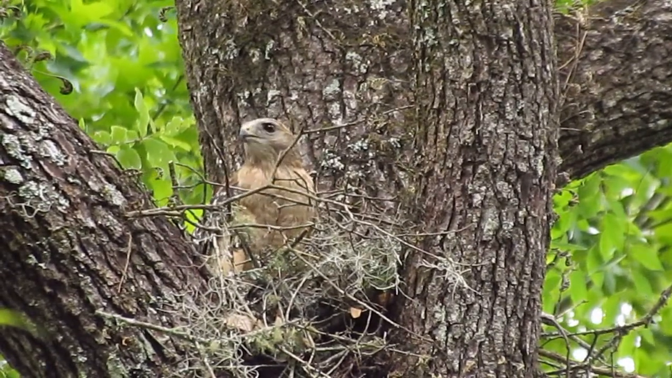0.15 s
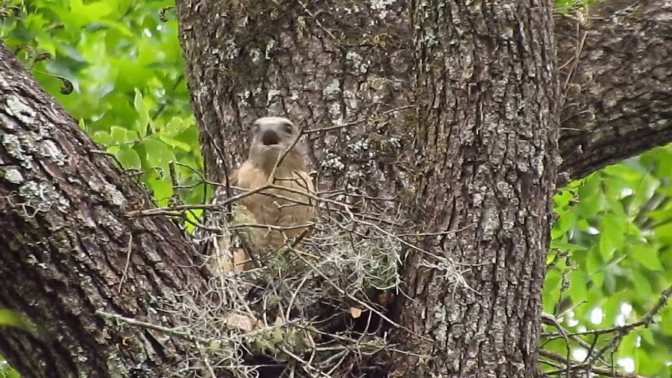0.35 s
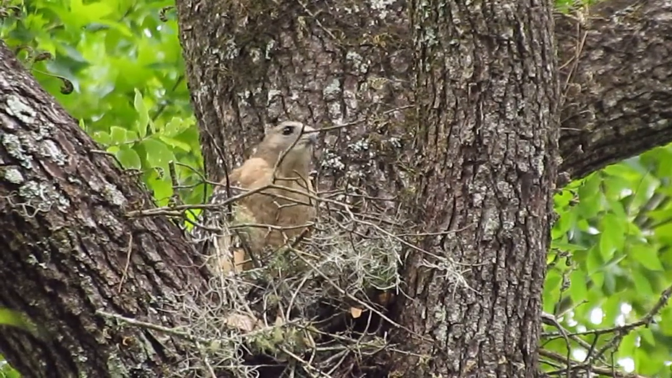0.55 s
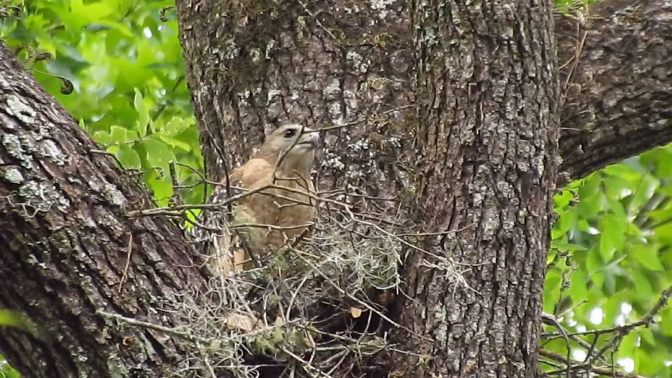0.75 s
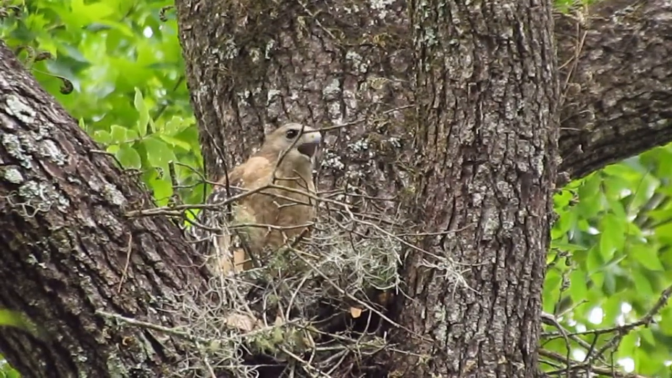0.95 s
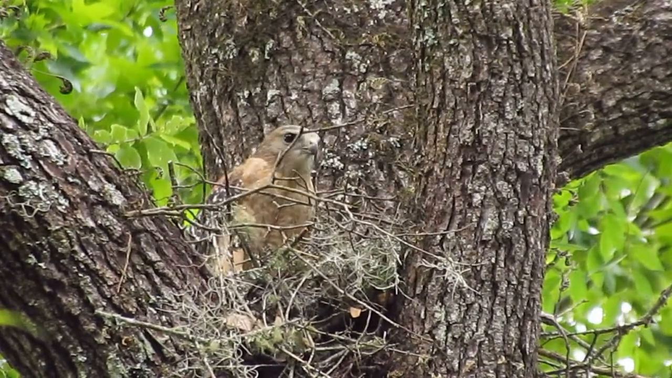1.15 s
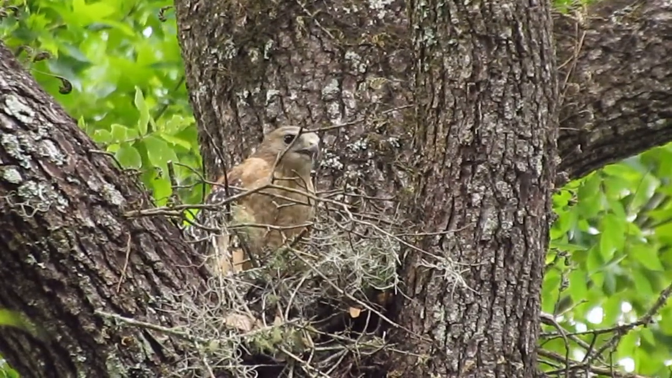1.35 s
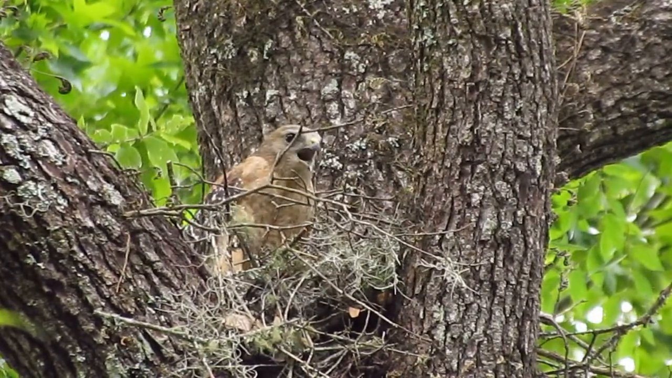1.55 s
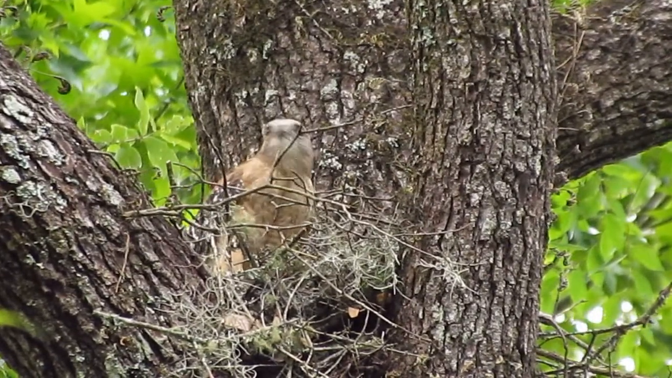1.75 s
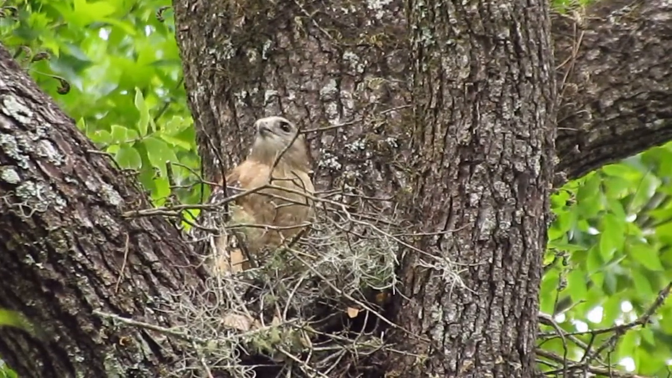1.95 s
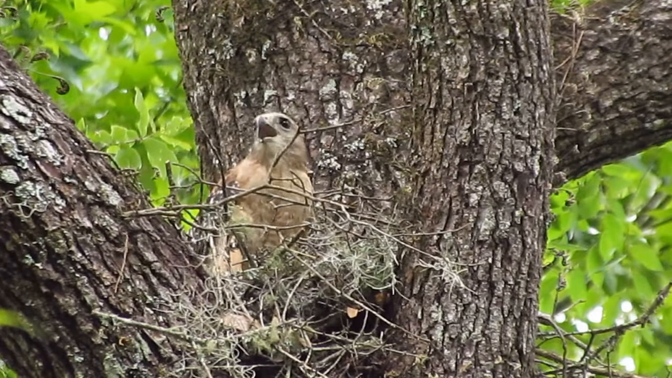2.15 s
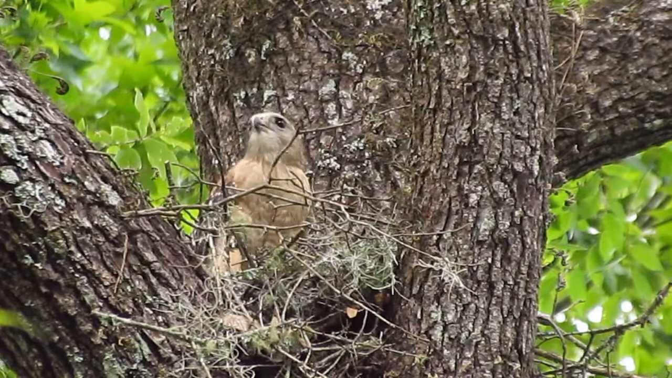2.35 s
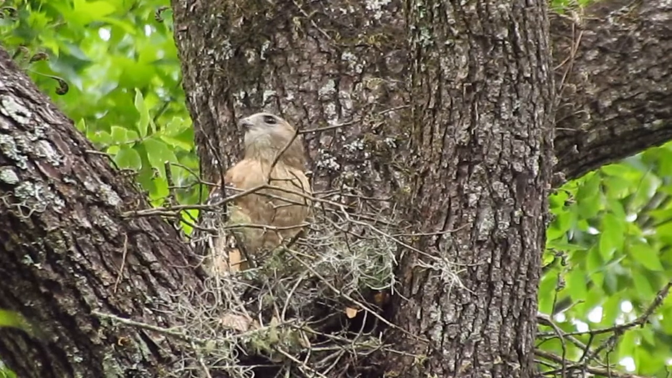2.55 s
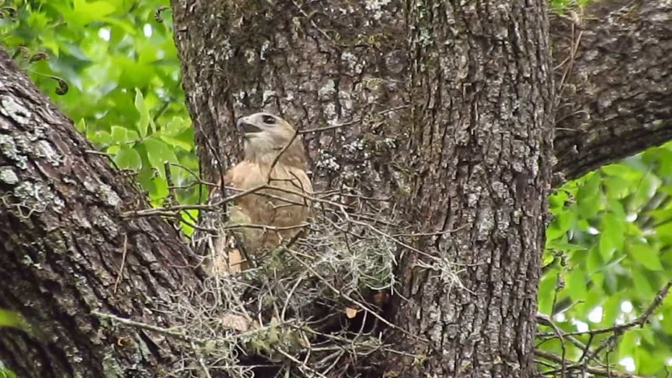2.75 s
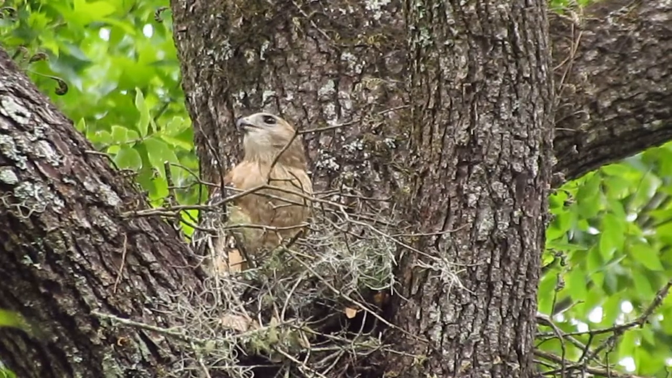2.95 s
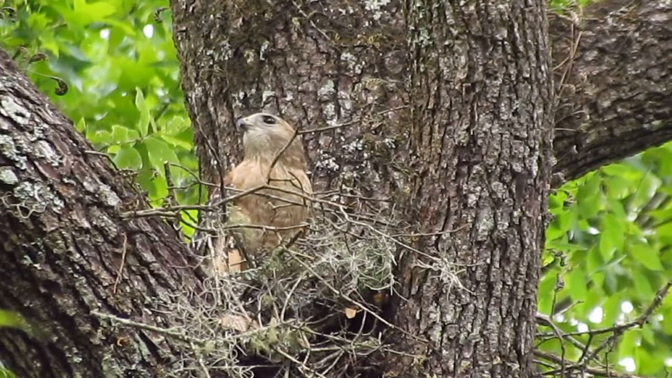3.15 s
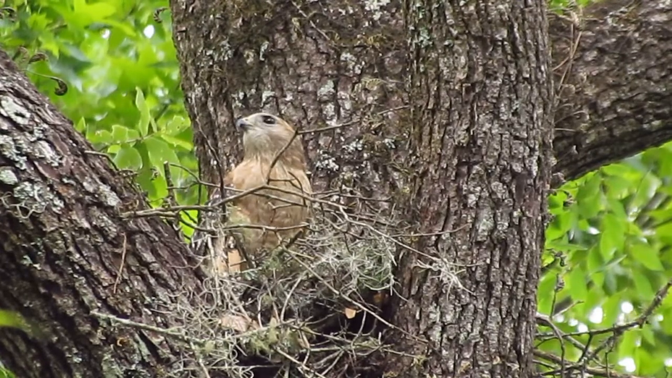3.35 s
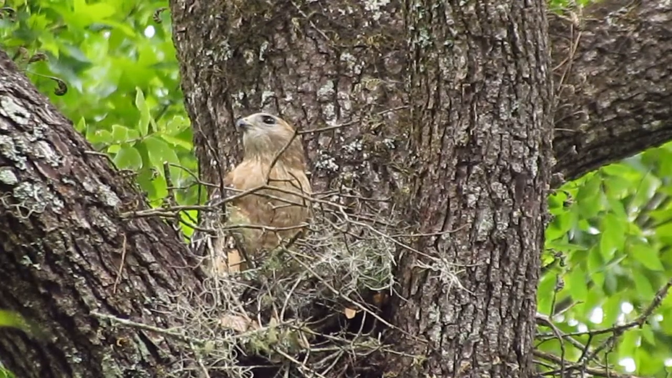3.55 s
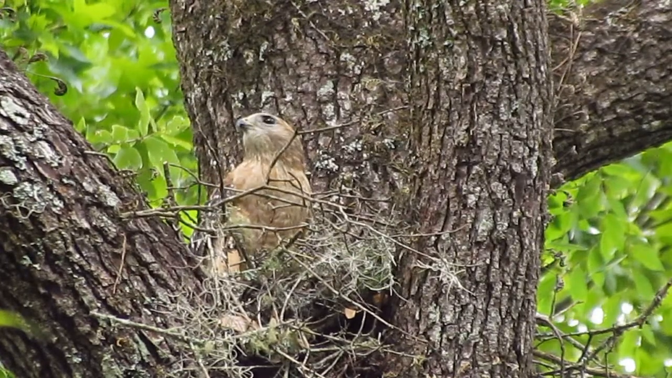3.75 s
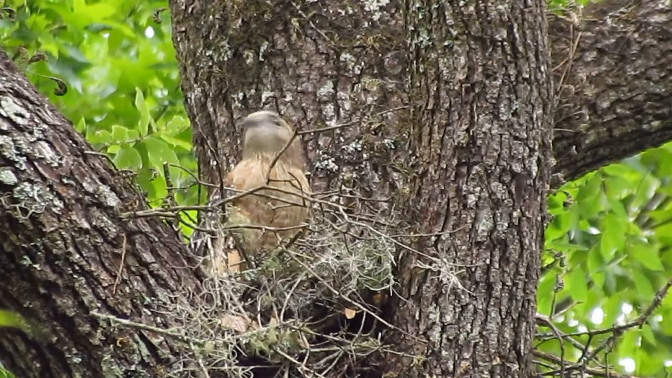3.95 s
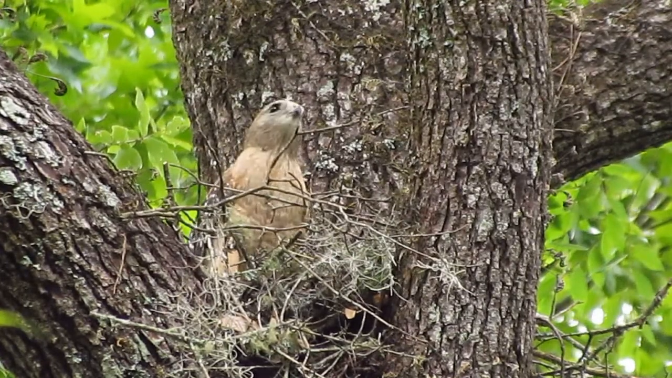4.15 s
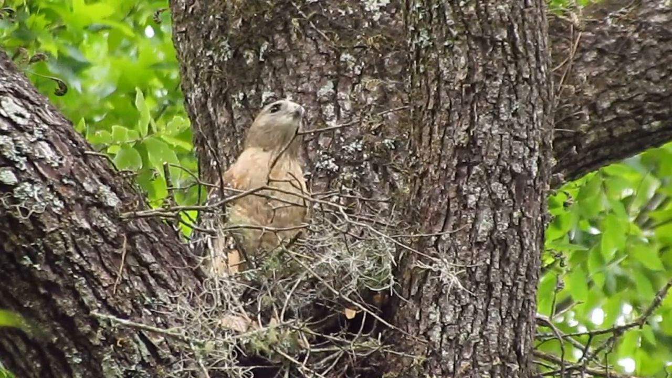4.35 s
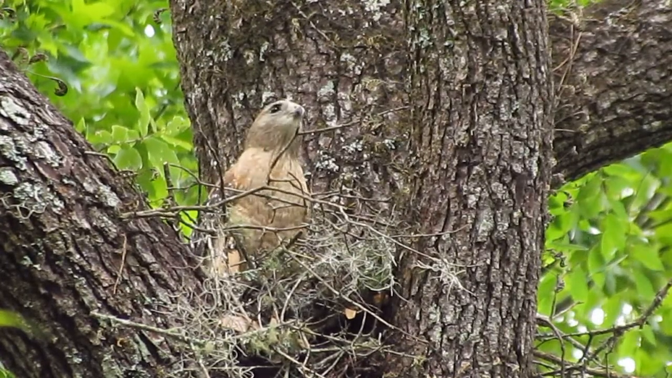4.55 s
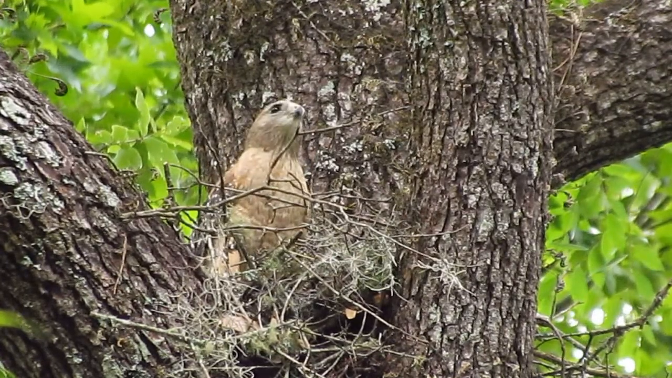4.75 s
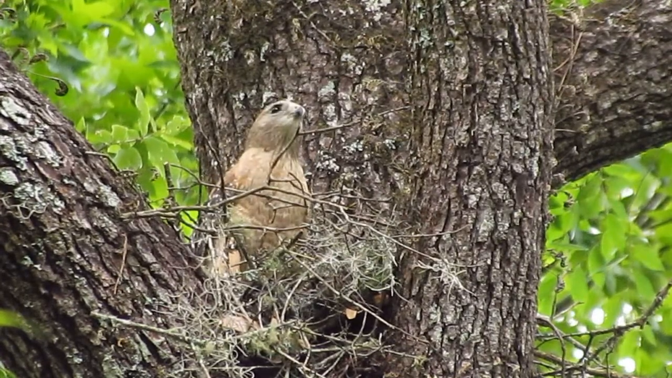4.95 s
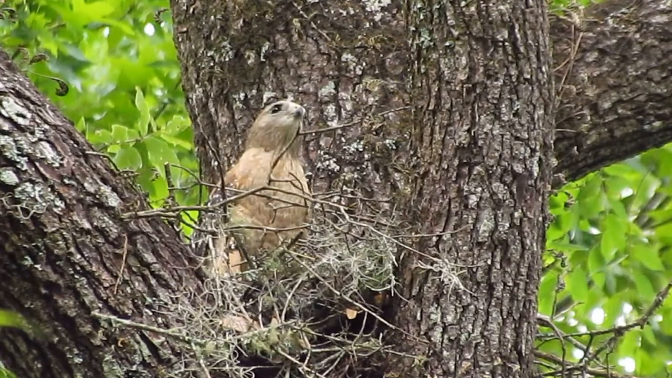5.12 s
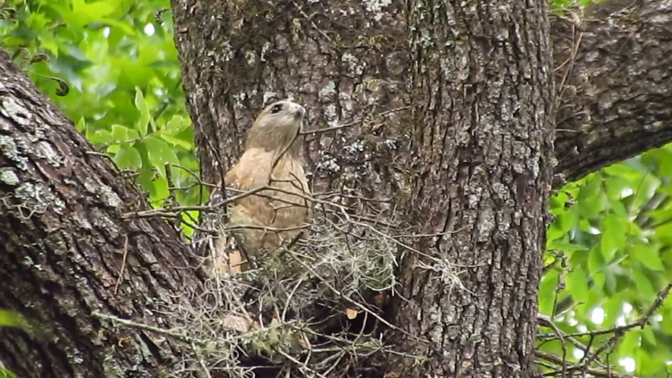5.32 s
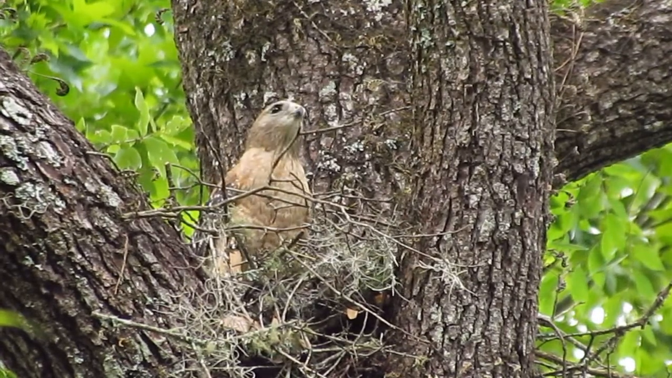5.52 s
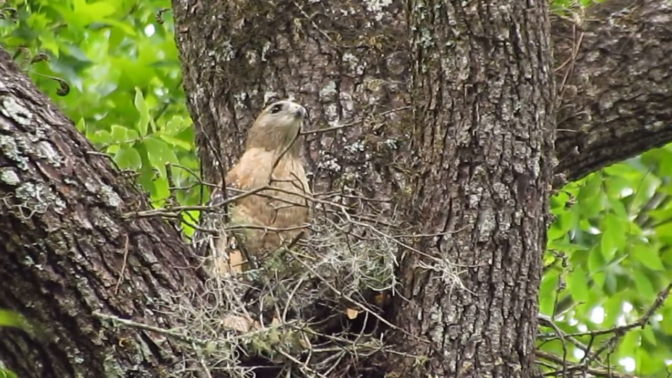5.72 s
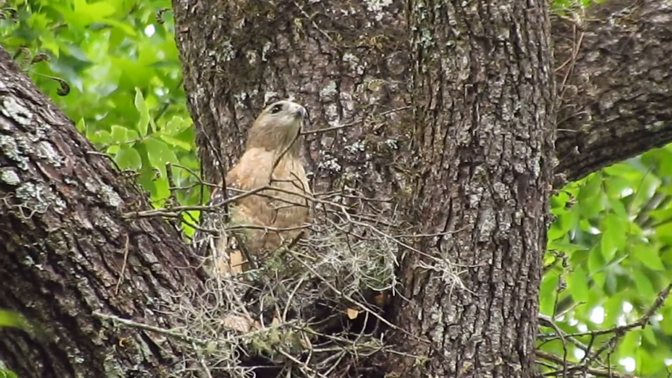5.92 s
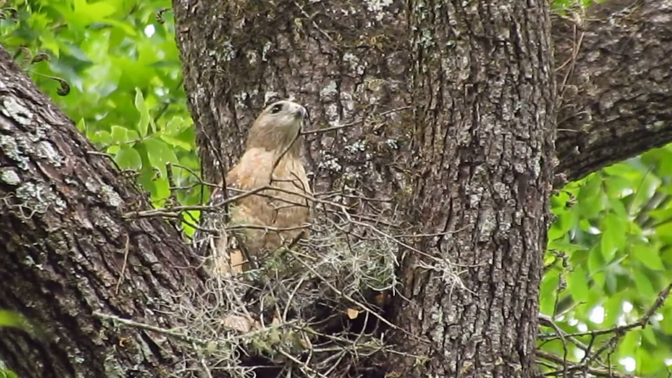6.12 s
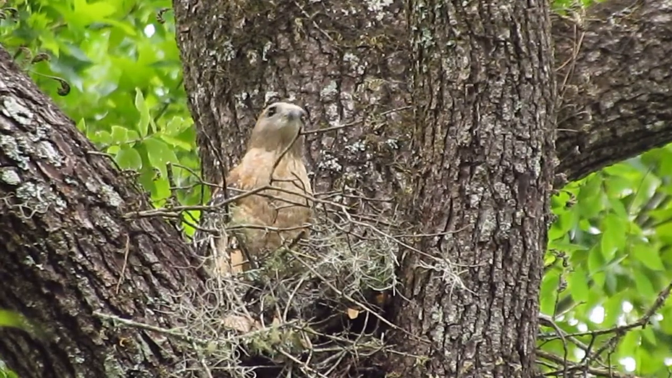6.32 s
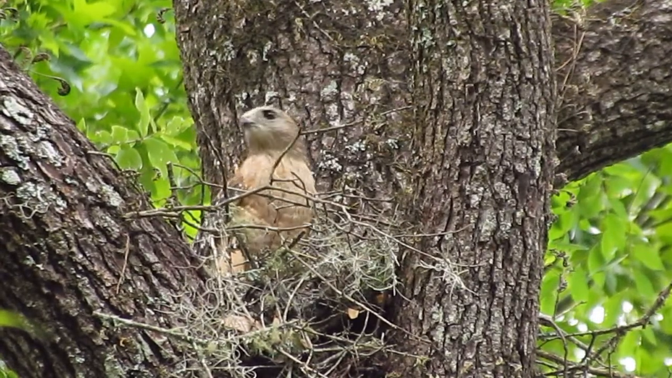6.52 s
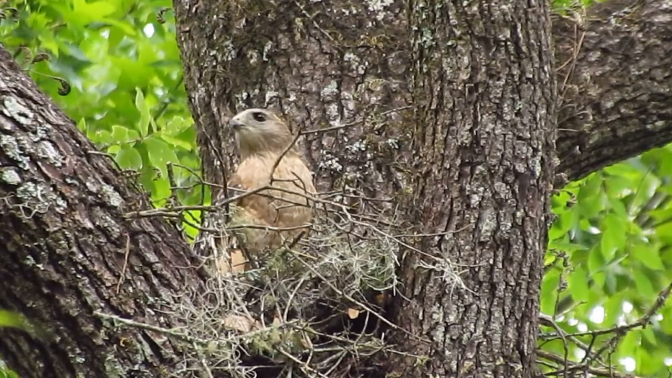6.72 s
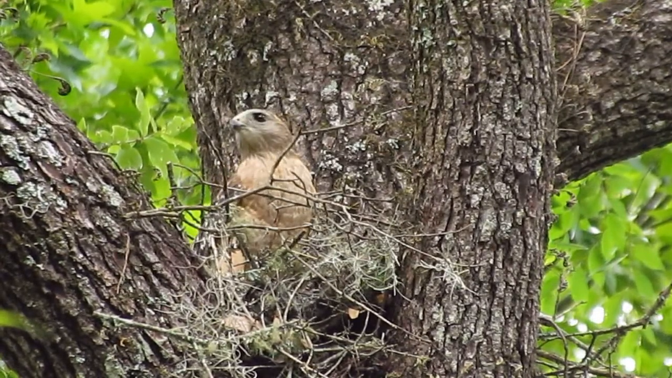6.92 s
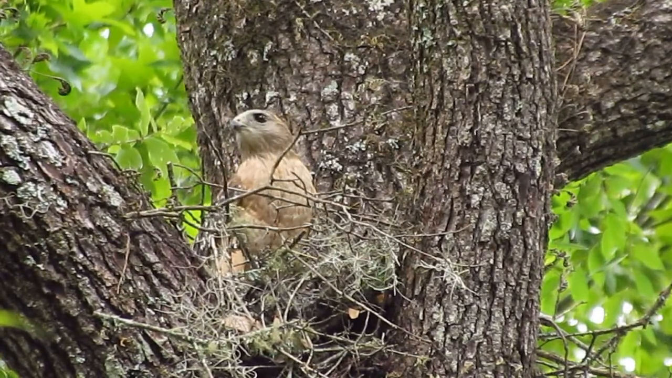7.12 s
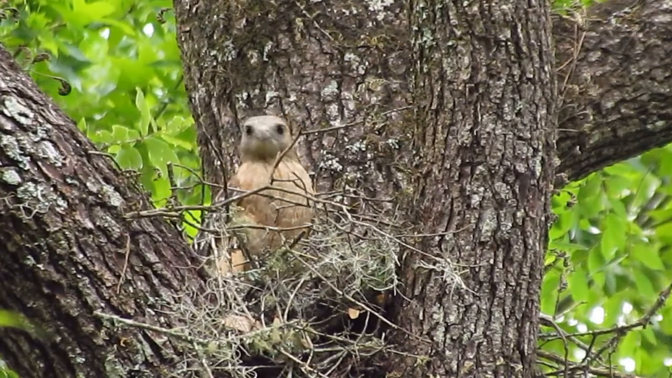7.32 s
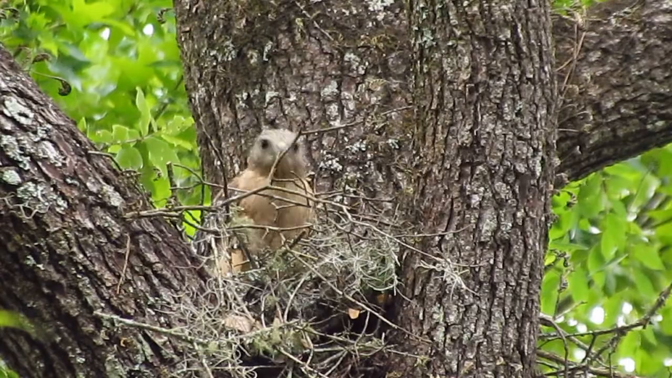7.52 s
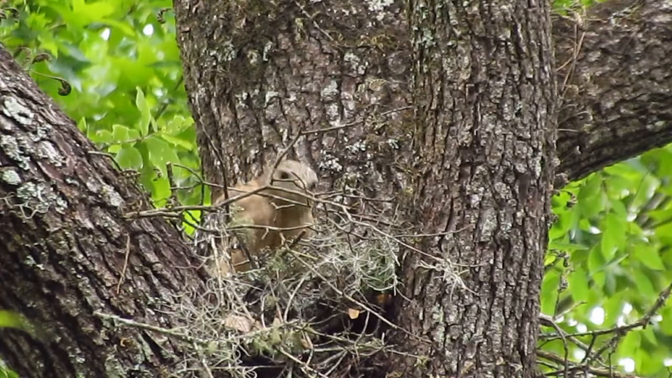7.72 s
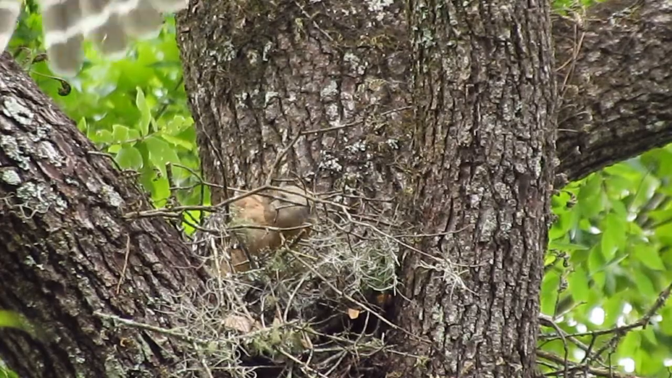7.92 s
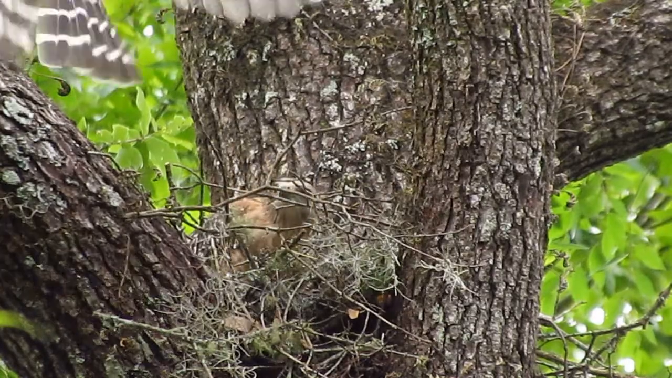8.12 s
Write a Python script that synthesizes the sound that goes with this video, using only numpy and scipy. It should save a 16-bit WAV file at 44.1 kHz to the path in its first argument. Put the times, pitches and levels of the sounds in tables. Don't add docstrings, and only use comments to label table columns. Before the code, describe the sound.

Outdoors among big trees, a hawk on its nest gives five loud, shrill falling screams about 0.6 seconds apart, each echoing off trunks and leaves. Then the calls stop; twigs crack sharply, a farther bird whistles a warbling reply, a brief rough croak sounds, and small birds chip. High crickets and a trilling insect continue over a faint distant traffic rumble.

```python
import sys
import numpy as np
from scipy import signal
from scipy.fft import rfft, irfft, next_fast_len
from scipy.io import wavfile
from scipy.ndimage import uniform_filter1d, map_coordinates

SR = 44100
rng = np.random.default_rng(int(sys.argv[2]) if len(sys.argv) > 2 else 0)


def unload_wav(signal):
    wavfile.write(
        sys.argv[1],
        SR,
        np.round(np.clip(np.atleast_2d(signal).T, -1, 1) * 32767).astype(np.int16),
    )


def convert_level_to_amplitude(level_db):
    exponent = np.asarray(level_db, float) / 20
    return 10 ** exponent


N = 365148
LEAD_S = 1
M = N + LEAD_S * SR
TIME = np.arange(M) / SR - LEAD_S


def unit(x):
    return x / np.sqrt(np.mean(x ** 2) + 1e-20)


def along(points, hz):
    f, v = np.transpose(points)
    return np.interp(np.log(hz + 1), np.log(f + 1), v)


def wobble(knots_per_s):
    knots = rng.standard_normal(int(M * 400 / SR) + 4)
    return map_coordinates(knots, [np.arange(M) * min(knots_per_s, 400) / SR], order=1)


def turns(hz):
    return 2 * np.pi * np.cumsum(hz) / SR


def span(start_s, length_s):
    first = round((start_s + LEAD_S) * SR)
    part = slice(first, min(M, round((start_s + length_s + LEAD_S) * SR)))
    return part, TIME[part]


# hz, correlation
ALIKE = [(30, 0.99), (100, 0.64), (250, 0.24), (700, 0.066), (2000, 0.11), (8000, 0.022)]


def rush(spectrum, patchy_db):
    z = signal.stft(rng.standard_normal((2, M)), nperseg=512)[2]
    field = uniform_filter1d(rng.standard_normal(z.shape[1:]), 6, 0)
    field = uniform_filter1d(field, 14, 1)
    pair = signal.istft(z * convert_level_to_amplitude(patchy_db * unit(field)), nperseg=512)[1][:, :M]
    size = next_fast_len(M)
    hz = np.fft.rfftfreq(size, 1 / SR)
    turn = np.arccos(np.clip(along(ALIKE, hz), -1, 1)) / 2
    shaped = rfft(pair, size) * convert_level_to_amplitude(along(spectrum, hz))
    mid, side = irfft(shaped * [np.cos(turn), np.sin(turn)], size)[:, :M]
    return unit(np.array([mid + side, mid - side]))


# hz, t60_s
WOOD = [(500, 0.28), (1300, 0.89), (2600, 1.22), (5000, 1.03), (9000, 0.77), (14000, 0.98)]


def wood(x, gap_s, alike):
    hz, t, z = signal.stft(rng.standard_normal((2, SR + SR // 5)), SR, nperseg=256)
    a, b = signal.istft(z * convert_level_to_amplitude(-60 * t / along(WOOD, hz)[:, None]), SR, nperseg=256)[1]
    turn = np.arccos(np.clip(alike, -1, 1)) / 2
    mid, side = np.cos(turn) * a, np.sin(turn) * b
    tail = np.array([mid + side, mid - side])
    tail *= np.clip(np.arange(len(a)) / SR / gap_s, 0, 1) ** 2 / np.linalg.norm(a)
    return signal.fftconvolve(x[None], tail, axes=1)[:, :M]


def leaves(x, t60_s):
    t = np.arange(SR // 10) / SR
    scatter = np.diff(rng.standard_normal((2, len(t) + 1))) * convert_level_to_amplitude(-60 * t / t60_s)
    return signal.fftconvolve(x[None], scatter / np.linalg.norm(scatter[0]), axes=1)[:, :M]


# hz, density_db
TRAFFIC = [(8.8, -52), (15, -9.5), (49, 0), (143, -9.5), (190, -13), (358, -19.5), (520, -22), (880, -120)]
AIR = [(120, -16.5), (200, -3.5), (346, -11), (983, -10), (1390, -14), (4200, -17), (5460, -11),
       (9240, -120)]
LEAF_HISS = [(4200, -8), (5600, 14), (6600, 4), (8600, -5), (10000, 3), (13500, -5), (15000, -27)]


def background():
    rumble = convert_level_to_amplitude(-49.5 + 1.8 * wobble(2.72)) * rush(TRAFFIC, patchy_db=0.5)
    air = convert_level_to_amplitude(-52) * rush(AIR, patchy_db=2.5)
    hiss = convert_level_to_amplitude(-51.5) * rush([(2200, -74)] + LEAF_HISS, patchy_db=2.6)
    return rumble + air + hiss


# pitch_hz, pulses_per_s, level_db
CRICKETS = [(4660, 56, -8.5), (4715, 47.9, -9), (4814, 43, -3.5), (4904, 47.8, -1), (5100, 53, -5),
            (5250, 43, -12)]
# time_s, level_db
CHORUS = [(3.2, -52.5), (3.53, -52), (4.02, -51.5), (4.84, -52), (5.26, -50), (5.66, -52), (6.06, -52.5),
          (6.3, -51.5), (7.68, -51.5), (8.02, -53.5), (8.28, -49.5)]


def crickets():
    chorus = 0
    drift = 0.003 * wobble(2.02)
    for pitch_hz, pulses_per_s, level_db in CRICKETS:
        stroke = np.clip(np.sin(turns(pulses_per_s * (1 + drift))) + 0.068, 0, None)
        tone = np.sin(turns(pitch_hz * (1 + 0.008 * wobble(40))))
        chorus = chorus + convert_level_to_amplitude(level_db + 1.4 * wobble(2.994)) * stroke * tone
    chorus = unit(chorus) * convert_level_to_amplitude(np.interp(TIME, *np.transpose(CHORUS)) + 4)
    straight = 0.65 * chorus * convert_level_to_amplitude([[1.5], [-1.5]])
    return straight + 1.04 * wood(chorus, gap_s=0.038, alike=0.024) * convert_level_to_amplitude([[1.2], [-1.2]])


# first_pip_s, length_s, level_db
TRILLS = [(-.204, 0.88, -47), (1.2, 0.9, -45.5), (2.405, 0.68, -47), (3.624, 1, -46.5), (4.863, 1, -47.5),
          (6.2805, 0.97, -46.5), (7.446, 1, -47.5)]


def triller():
    out, uneven = np.zeros(M), convert_level_to_amplitude(wobble(25))
    for first_pip_s, length_s, level_db in TRILLS:
        part, t = span(first_pip_s - 0.016, length_s)
        u = ((t - first_pip_s) * 30.3 + 0.5) % 1 - 0.5
        warm = 1 - np.exp(-(t - first_pip_s + 0.03) / 0.083)
        pitch_hz = (5250 + 530 * warm) * (1 - 0.3285 * u)
        fade = warm * np.clip((first_pip_s + length_s - t) / 0.56, 0, 1)
        out[part] = convert_level_to_amplitude(level_db + 3) * fade * np.exp(-(u / 0.13) ** 2) * np.sin(turns(pitch_hz))
    out *= uneven
    return out * convert_level_to_amplitude([[1.2], [-1.2]]) + 0.47 * wood(out, gap_s=0.016, alike=0.18)


CLIMB_HZ_PER_S2 = 38000
SLIDE_S, AAH_PITCH = 0.08, 0.9
DROOP_HZ, DROOP_S = 45.5, 0.01816
RING_HZ, RING_WIDTH_HZ = 2490, 22.3


def contour(start_s, length_s, climb_s, top_hz, last_hz, full_db, full_s, spent_db, swell_db, dulling_db):
    t = np.linspace(0, length_s, num=70)
    late, left = t - climb_s, length_s - t
    aah_top_hz = AAH_PITCH * top_hz
    slid = (late - SLIDE_S) / (length_s - climb_s - SLIDE_S)
    aah_hz = aah_top_hz + (last_hz + DROOP_HZ - aah_top_hz) * slid
    kee = np.exp(-(1.8 * np.clip(late, 0, None) / SLIDE_S) ** 2)
    pitch_hz = aah_hz + (top_hz - aah_hz) * kee
    pitch_hz -= CLIMB_HZ_PER_S2 * np.clip(late, None, 0) ** 2 + DROOP_HZ * np.exp(-left / DROOP_S)

    db = spent_db + (full_db - spent_db) / (1 + np.exp((t - full_s) / 0.016))
    db += -3.5 * np.exp(-t / 0.0091) - 5.5 * t
    push_db = swell_db * np.exp(-((2 * pitch_hz - RING_HZ) / RING_WIDTH_HZ) ** 2)
    bright = 2 + dulling_db * t + 5.5 * np.exp(-t / 0.032)
    bright -= 0.12 * (db + 24.5) + 1.6 * push_db
    trim_db = -8.5 - 0.15 * (db + 22) - push_db
    return np.transpose([start_s + t, pitch_hz, db + push_db, bright, trim_db])


# hz, level_db
THROAT = [(500, -2.5), (1300, -3.5), (2850, 2), (3300, -15), (4300, -13), (7000, -19), (10500, -32),
          (14000, -39.5)]


def scream(rows, jitter, scoop_s=0.022, drop_s=0.042):
    first, last = rows[0], rows[-1]

    def bent(row, after_s, ratio, db, trim_db):
        return (row[0] + after_s, ratio * row[1], row[2] + db, row[3] + trim_db, row[4])

    rows = [bent(first, -scoop_s, 0.45, -22, -9),
            bent(first, -0.2017 * scoop_s, 0.71, -9, -4),
            *rows,
            bent(last, 0.264 * drop_s, 0.78, -11, -12),
            bent(last, drop_s, 0.68, -24, -12)]
    s, *cols = np.transpose(rows)
    part, t = span(s[0], s[-1] - s[0])
    pitch_hz, db, bright, trim_db = (uniform_filter1d(np.interp(t, s, c), size=300) for c in cols)
    loose = uniform_filter1d(((t < first[0]) | (t > last[0])) * 1.0, size=300)
    phase = turns(pitch_hz * (1 + (1 + 6 * loose) * jitter[part]))
    k = np.arange(1, 20)[:, None]
    flicker = uniform_filter1d(rng.standard_normal((len(k), SR // 2)), size=700, axis=1)
    flicker = unit(flicker)[:, :len(t)]
    line_db = along(THROAT, k * pitch_hz) + bright * np.log2(np.maximum(k, 2) / 2)
    line_db += trim_db * (k == 1) + 2.26 * np.log2(k) * flicker
    lines = convert_level_to_amplitude(line_db) * (k * pitch_hz < 15000) * np.sin(k * phase + 0.291 * k * k)
    rasp = unit(uniform_filter1d(rng.standard_normal(SR // 2), size=12))[:len(t)]
    voice = np.sum(lines, axis=0) + convert_level_to_amplitude(-12) * rasp * np.sum(lines[2:], axis=0)
    edges = np.clip(np.minimum(t - s[0], s[-1] - t) / 0.00067, 0, 1)
    return part, np.sqrt(2) * convert_level_to_amplitude(db - 0.5) * edges * voice


# start_s, length_s, climb_s, top_hz, last_hz
SCREAMS = [(0.314, 0.21, 0.035, 1342, 1140), (0.907, 0.21, 0.031, 1419, 1215),
           (1.48, 0.25, 0.041, 1448, 1177), (2.101, .263, .064, 1388, 1149),
           (2.772, 0.27, 0.055, 1330, 1011)]
# full_db, full_s, spent_db, swell_db, dulling_db_per_octave_s
EFFORT = [(-23, 0.12, -27, 2.5, -8.5), (-18.5, 0.067, -24.5, 6, -9), (-16, 0.083, -23, 5.5, -18.5),
          (-21.5, 0.18, -24.5, 2, -13), (-21.5, .137, -26, 9, -31)]


def hawk():
    out, jitter = np.zeros(M), 0.0013 * wobble(120)
    shapes = [(-0.23, 0.206, 0.032, 1320.5, 1123.5), *SCREAMS]
    efforts = [(-24, -0.37, -32, -1, -8), *EFFORT]
    for shape, effort in zip(shapes, efforts):
        part, call = scream(contour(*shape, *effort), jitter)
        out[part] += call
    return out * convert_level_to_amplitude(0.067 * wobble(60))


# start_s, pitch_hz, level_db, t60_s
THUMP = (2.5, 102, -52, .14)


def thump():
    out, (start_s, pitch_hz, level_db, t60_s) = np.zeros(M), THUMP
    part, t = span(start_s, 0.2)
    t = t - start_s
    out[part] = convert_level_to_amplitude(level_db - 60 * t / t60_s) * np.sin(2 * np.pi * pitch_hz * t)
    return out


# start_s, peak_db, body_hz, echo_db
SNAPS = [(3.537, -30, 1270, 2), (3.55, -24, 4940, 0.5), (3.64, -30.5, 2150, 1), (3.828, -27, 4500, 8.5),
         (3.845, -28, 1360, 1), (4.286, -54, 8100, 25), (4.307, -21, 2490, 5), (6.566, -45, 6500, 15.5),
         (7.531, -40.5, 2170, 1), (8.241, -41, 8200, 4)]


def snaps():
    near, far, t = np.zeros(M + SR), np.zeros(M + SR), np.arange(800) / SR
    for start_s, peak_db, body_hz, echo_db in SNAPS:
        crack = 0.22 * convert_level_to_amplitude(-60 * t / 0.0041) * rng.standard_normal(len(t))
        swell = 1 - convert_level_to_amplitude(-60 * t / 0.001)
        ring = 1.35 * swell * convert_level_to_amplitude(-60 * t / 0.0026) * np.sin(2 * np.pi * body_hz * t)
        at = round((start_s + LEAD_S) * SR)
        near[at:at + len(t)] += convert_level_to_amplitude(peak_db + 5.5) * (crack + ring)
        pulse = np.cos(2 * np.pi * body_hz * t + 0.32)
        far[at:at + len(t)] += convert_level_to_amplitude(peak_db + echo_db - 60 * t / 0.00071) * pulse
    return near[:M], far[:M]


# start_s, length_s, top_hz, level_db, distance_db
CHIPS = [(3.725, 0.038, 3700, -56, 12), (4.914, 0.047, 4480, -50, 8.5), (6.597, 0.044, 4835, -32.5, -1),
         (7.149, 0.04, 4970, -36.5, 2.5), (7.648, .072, 5380, -44, 12), (8.12, 0.1, 4830, -54.5, 15)]


def chips():
    near, far = np.zeros(M), np.zeros(M)
    foot_hz, fall_s = 3210, 0.023
    for start_s, length_s, top_hz, level_db, distance_db in CHIPS:
        place = np.clip(1 - fall_s / length_s, 0.2, 0.8)
        over_db = -3.5 - 0.59 * distance_db
        part, t = span(start_s, length_s)
        u = np.clip((t - start_s) / length_s, 0, 1)
        from_top = np.where(u < place, 1 - u / place, (u - place) / (1 - place))
        phase = turns(foot_hz + (top_hz - foot_hz) * (1 - from_top ** 2.4))
        note = np.sin(phase) + convert_level_to_amplitude(over_db) * np.sin(2 * phase)
        note *= convert_level_to_amplitude(level_db) * np.clip(np.minimum(u, 1 - u) / 0.12, 0, 1)
        near[part] += note
        far[part] += note * convert_level_to_amplitude(distance_db)
    return near, far


# time_s, pitch_hz, level_db
ANSWER = [(3.77, 2834, -45.5), (3.808, 2760, -38), (3.833, 2131, -43), (3.852, 2740, -39),
          (3.875, 3084, -39), (3.915, 3038, -33.5), (3.935, 2730, -41), (4.02, 2620, -39),
          (4.09, 2340, -54)]


def answer():
    s, *cols = np.transpose(ANSWER)
    pitch_hz, db = (np.interp(TIME, s, c) for c in cols)
    warble = 1.1 * np.clip(TIME - 3.95, 0, None) * np.sin(2 * np.pi * 38 * TIME)
    tone = np.sin(turns(pitch_hz * (1 + warble + 0.012 * wobble(150))))
    tone *= convert_level_to_amplitude(2.7 * wobble(120))
    attack = np.clip(1 + (TIME - s[0]) / 0.014, 0, 1) ** 2
    return tone * convert_level_to_amplitude(db) * attack * (TIME < s[-1])


# hz, level_db
CROAK_BODY = [(500, -31), (1100, -1.5), (1650, 0), (2600, -8), (3300, 4), (4400, -21), (8000, -9),
              (9500, -19)]


def croak():
    out, start_s, held_s, release_s = np.zeros(M), 5.365, 0.052, 0.02
    part, t = span(start_s, held_s + release_s)
    t = t - start_s
    ending = np.clip((t - held_s) / release_s, 0, 1)
    rate_hz = 563 * 0.85 ** ending
    db = -43.5 + 7 * np.clip(t / held_s, 0, 1) ** 3 - 18 * ending
    phase = turns(rate_hz * (1 + 0.0774 * wobble(300)[part]))
    k = np.arange(1, 20)[:, None]
    pulses = np.sum(convert_level_to_amplitude(along(CROAK_BODY, k * rate_hz)) * np.cos(k * phase), axis=0)
    rasp = uniform_filter1d(rng.standard_normal(SR // 2), size=20)[:len(t)]
    attack = np.clip(t / 0.004, 0, 1)
    out[part] = convert_level_to_amplitude(db) * attack * unit(pulses) * (1 + 0.37 * unit(rasp))
    return out


# start_s, length_s, pitch_hz, level_db
SQUEAKS = [(6.56, 0.034, 1570, -47.5), (7.118, 0.032, 1470, -51), (7.185, 0.0082, 1550, -47),
           (8.192, 0.015, 1596, -52)]


def squeaks():
    out, unsteady = np.zeros(M), 0.0074 * wobble(130)
    for start_s, length_s, pitch_hz, level_db in SQUEAKS:
        part, t = span(start_s, length_s)
        t = t - start_s
        phase = turns(pitch_hz * (1 - 3 * t + unsteady[part]))
        swell = np.abs(np.sin(np.pi * t / length_s)) ** 0.5
        out[part] += convert_level_to_amplitude(level_db) * (np.sin(phase) + 0.39 * np.sin(2 * phase)) * swell
    return out


def scene():
    bird, other, rough = hawk(), answer(), croak()
    chip, chip_far = chips()
    snap, snap_far = snaps()

    calls = bird * convert_level_to_amplitude([[-0.5], [0.5]])
    calls += convert_level_to_amplitude([[-11], [-9]]) * np.roll(bird, round(0.027 * SR))
    calls += convert_level_to_amplitude(-1.5) * leaves(bird, t60_s=0.2)
    calls += convert_level_to_amplitude(-7) * wood(bird * convert_level_to_amplitude(3.43 * wobble(70)), gap_s=0.0037, alike=0.23)

    reply = 0.86 * other * convert_level_to_amplitude([[2.5], [-2.5]])
    reply += convert_level_to_amplitude(-3) * wood(other, gap_s=0.0031, alike=0.14) + convert_level_to_amplitude(9.5) * leaves(other, t60_s=0.1)

    trunk = 0.4 * np.roll(chip, round(0.0084 * SR))
    small = chip + trunk + snap + thump() + squeaks() + rough
    scattered = chip_far * convert_level_to_amplitude(1.8 * wobble(90)) + 0.5 * rough
    small = small + convert_level_to_amplitude(-4) * wood(scattered, gap_s=0.006, alike=0.37)
    small += convert_level_to_amplitude(3.5) * leaves(chip + snap + rough, t60_s=0.02)
    small += convert_level_to_amplitude(16) * wood(snap_far, gap_s=0.0014, alike=0.12)
    return (calls + reply + small + crickets() + triller() + background())[:, -N:]


def levelled(x, top, knee):
    loud = np.sqrt(2 * np.abs(uniform_filter1d(np.mean(x ** 2, axis=0), size=500)))
    return x / (1 + (loud / top) ** knee) ** (1 / knee)


def roll_off(x):
    return signal.sosfilt(signal.butter(12, 14510, fs=SR, output="sos"), x)


def record(dry):
    dry, size = levelled(dry, top=0.88, knee=4.2), next_fast_len(N)
    hz = np.fft.rfftfreq(size, 1 / SR)
    treble = irfft(rfft(dry, size) * hz / 5000, size)[:, :N]
    shifted = treble * np.cos(2 * np.pi * (48000 - 44100) * np.arange(N) / SR)
    edge = convert_level_to_amplitude(-40 * np.clip((hz - 13400) / 900, 0, 3) ** 2)
    mix = irfft(rfft(dry + convert_level_to_amplitude(-13) * shifted, size) * edge, size)[:, :N]
    return roll_off(mix)


dry = scene()
out = record(dry)
unload_wav(out)
```